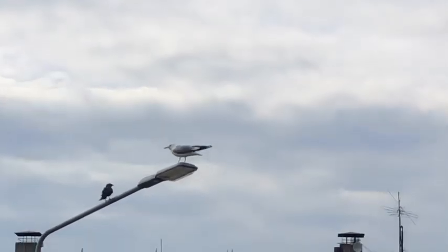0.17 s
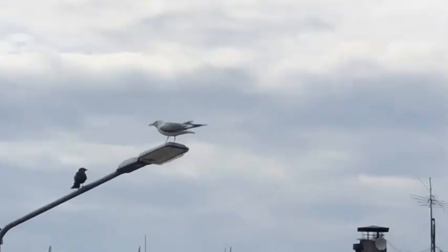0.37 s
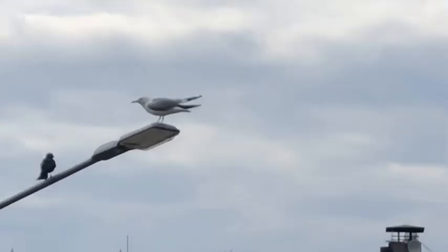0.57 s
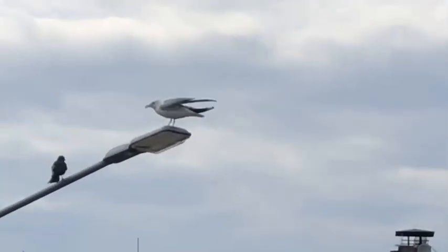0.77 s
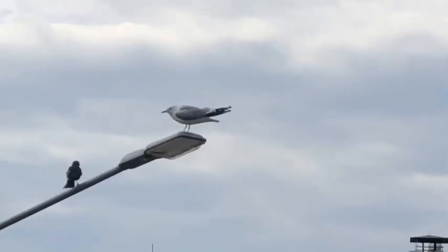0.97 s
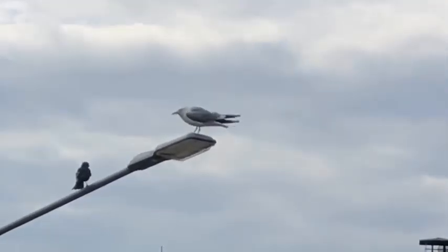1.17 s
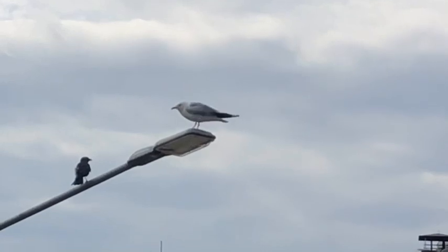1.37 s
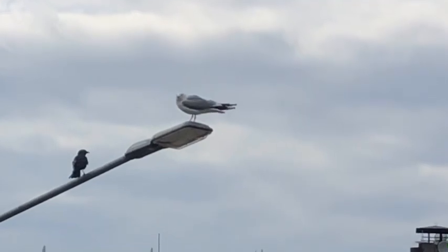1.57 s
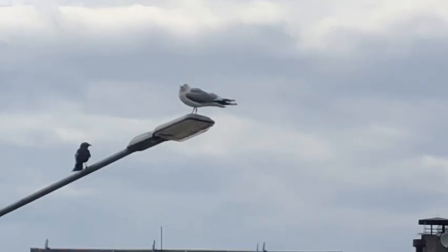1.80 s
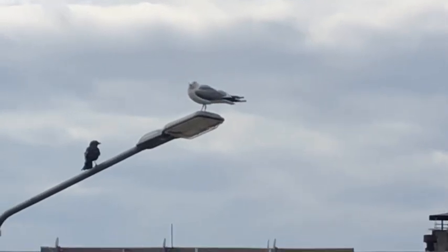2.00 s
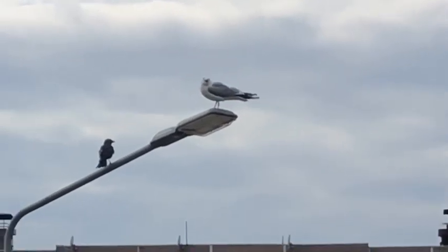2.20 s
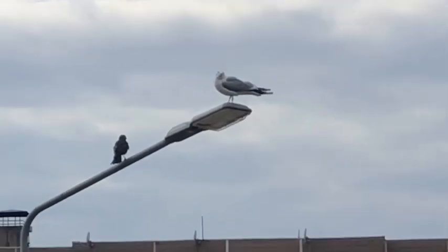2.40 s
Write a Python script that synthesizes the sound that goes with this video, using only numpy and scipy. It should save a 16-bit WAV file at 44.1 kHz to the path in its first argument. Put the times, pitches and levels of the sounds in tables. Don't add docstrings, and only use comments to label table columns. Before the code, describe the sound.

Outdoors in a town, a gull calls harshly at uneven intervals, the last cry brightest after a longer gap. Wind buffets the handheld microphone, fingers thump and tap its case, and a small bird chirps faintly far off.

```python
import sys
import numpy as np
from scipy import signal
from scipy.fft import irfft
from scipy.io import wavfile
from scipy.ndimage import uniform_filter1d

SR = 44100
rng = np.random.default_rng(int(sys.argv[2]) if len(sys.argv) > 2 else 0)


def invert_db(level):
    return 10 ** (np.asarray(level, dtype=float) / 20)


def to_wav(sig):
    pcm = np.clip(np.atleast_2d(sig), -1, 1) * 32767
    pcm = np.round(pcm).astype(np.int16)
    wavfile.write(sys.argv[1], SR, pcm.T)


N = 108045

# t/s, level/dB
GUSTS = [(0, -47), (.39, -42), (.62, -46.5), (.72, -52.5), (.85, -48.5), (1.049, -53), (1.27, -48.5),
         (1.4, -44), (1.65, -45), (1.8, -56), (2.07, -51.5), (2.3, -49.5), (2.4, -48.5), (2.45, -46.5)]
# start/s, length/s, level/dB
BUFFETS = [(.0, 0.024, -37), (.11, 0.065, -39.5), (.3, 0.082, -44), (.46, 0.18, -47.5), (.82, 0.093, -43.5),
           (.91, .13, -55.5), (1.26, 0.011, -35.5), (1.39, 0.028, -37), (1.56, 0.096, -45),
           (1.72, 0.026, -38.5), (2.15, 0.048, -31), (2.28, 0.068, -44.5)]
# f/Hz, density/dB
WIND_SPECTRUM = [(15, -50), (30, -17), (50, -1), (81, 0.5), (186, -8.5), (320, -24), (576, -33),
                 (1540, -96)]
# f/Hz, density/dB
TOWN_SPECTRUM = [(100, -18), (250, -6.5), (900, -12), (1700, -26), (4000, -30.5), (7700, -41), (13500, -41),
                 (15300, -45.5)]
# start/s, length/s, level/dB
RUBS = [
    (.0, 0.147, -60.5),
    (.312, 0.034, -49),
    (.46, 0.124, -49.5),
    (.87, 0.14, -63.5),
    (1.39, .17, -55),
    (1.535, 0.016, -52),
    (1.55, 0.109, -59),
    (1.71, 0.026, -54),
    (2.06, 0.057, -63),
    (2.35, 0.09, -75),
]
# f/Hz, density/dB
RUB_SPECTRUM = [(150, -18.5), (500, -9), (1000, -7), (3400, -19.5), (5500, -45), (9600, -38),
                (13500, -42.5), (15300, -39.5)]
# break/s, crest after break/s, crest f/Hz, level/dB, break length/s
CRIES = [
    (0.018, 0.0031, 1039, -44, 0.0077),
    (.397, 0.0045, 1039, -42.5, 0.0097),
    (0.792, .025, 1063, -43.5, 0.0057),
    (1.306, .04, 1136, -40.5, .017),
    (2.262, 0.026, 1057, -39.5, 0.0085),
]
# climb/s, climb rate/(Hz/s), fall 50 ms from crest/Hz, last f/Hz, brightness/(dB/oct)
DELIVERIES = [
    (.05, 6400, 290, 730, -6.5),
    (0.055, 4900, 180, 470, -4.5),
    (0.052, 5500, 260, 430, -3.5),
    (0.042, 5800, 320, 590, -2),
    (0.043, 6500, 310, 460, -0.5),
]
# dip f/Hz, dip depth/dB, share of the fall used in rising to crest, body/dB
GAPES = [
    (3950, -12, .3, -1),
    (6600, -7.5, 0.22, -0.5),
    (7590, -5, .15, 0.5),
    (8600, -4.5, .65, 0.5),
    (8700, -8.5, 0.37, 0),
]
# f/Hz, gain/dB
THROAT_LOW = [(650, -6), (1050, -3.5), (1500, -2), (2400, -4.5), (4000, -10.5), (6800, -24.5),
              (9500, -19.5), (14000, -33)]
# f/Hz, gain/dB
THROAT_HIGH = [(600, 1.5), (1100, -9), (2100, 0), (3300, 0), (5300, -7.5), (8000, -15), (11000, -18),
               (16000, -29.5)]
# delay/s, level/dB, smear/s
ECHOES = [(.045, -28.5, 0.017), (.07, -30, 0.0075), (0.107, -24, 0.035), (.19, -23.5, 0.058),
          (.325, -27, 0.033), (.485, -25, 0.018), (.575, -24, 0.016)]
# delay/s, level/dB
NEAR_WALLS = [(.0076, -16.5), (.0094, -17), (.0172, -7.5), (0.0214, -13), (0.0232, -11), (0.0275, -17.5)]
# t/s, peak/dB, brightness f/Hz
TAPS = [(.212, -24, 1310), (0.2142, -30, 2500), (.287, -35.5, 815), (0.32, -35.5, 1600), (.316, -42, 2200),
        (.323, -41, 2500), (.327, -32, 1030), (0.329, -53, 707), (.58, -32, 930), (.615, -30.5, 1850),
        (1.095, -46, 865), (1.111, -44.5, 1620), (1.128, -31.5, 1690), (1.258, -33.5, 1030),
        (1.538, -36.5, 1870), (1.547, -52, 890), (1.693, -45.5, 719), (1.744, -27, 1040), (1.845, -50, 915),
        (2.096, -41, 1175), (2.158, -61, 2500), (2.179, -54, 1490)]
# centre t/s, peak/dB, f/Hz, length/s
THUMPS = [
    (.2325, -7.6, 86, .0105),
    (.223, -18, 135, .004),
    (.2158, -22.5, 310, .0018),
    (.1577, -28, 190, .004),
    (.1285, -30, 150, .004),
    (.677, -29, 92, .012),
    (1.152, -31, 64, .016),
    (2.196, -29, 75, .012),
    (.29, -31, 62, .02),
]
# t/s, peak/dB
TICKS = [(0.2095, -54.5), (1.0048, -54), (1.042, -50.5), (1.1224, -55), (1.8048, -51), (1.8437, -64),
         (2.0004, -57.5), (2.104, -56), (2.1497, -53), (2.072, -56.5), (2.178, -57.5), (2.095, -55)]
# t/s, level/dB, f/Hz, length/s
POPS = [
    (1.04, -41, 920, 0.005),
    (1.899, -44, 986, 0.0041),
    (2.072, -45, 800, 0.0076),
    (2.125, -40, 700, 0.005),
    (.695, -48, 860, 0.0044),
]
# t/s, level/dB
CHIRPS = [
    (1.424, -53.5),
    (1.501, -57),
    (1.578, -58),
    (1.663, -56.5),
    (1.74, -57),
    (1.843, -58.5),
    (1.919, -62),
    (2.008, -59.5),
    (.72, -63),
    (2.197, -78),
]

TOWN_DB, TOWN_FOLLOWS_GUST = -56.5, 0.28
RUB_EDGE_S = 0.01
HISS_DB, HISS_LOW_HZ, HISS_RUB_DB = -67.5, 15000, -12

JITTER, SHIMMER_DB, UNEVEN_DB = 0.0045, 2, 1.54
RASP_LOW_DB, RASP_HIGH_DB, RASP_SAG_DB_PER_OCT = -15.5, -19, 14
BREAK_HZ, BREAK_DB, SAG_POWER = 798, -5, 2.3
DIP_OCT, BODY_HZ = 0.1, 2500
DULL_HZ, DULL_DB_PER_OCT = 4450, 24
TAIL_HZ, TAIL_DB_PER_OCT = 1350, -23.5
ATTACK_S, RELEASE_S, LOW_DB, SAG_DB_PER_OCT = 0.026, 0.021, -2.5, 18
CRY_LEAD, CRY_LEN = 3000, 10000

ECHO_LOW_HZ, ECHO_CUT_HZ, NEAR_CUT_HZ = 1710, 4400, 3900
STREET_DB, STREET_T60_S = -22.5, 0.18
TAP_TURNS, TAP_BASS_HZ, TAP_LEN = 1.55, 82, 4096
TICK_HZ, TICK_S = 5540, 0.0015
CHIRP_TOP_HZ, CHIRP_END_HZ, CHIRP_S, CHIRP_ROUGH = 6200, 3800, 0.028, 0.12
CUTOFF_HZ = 15900


def rms_one(x):
    return x / np.sqrt(np.mean(x ** 2) + 1e-20)


def at_hz(points, hz):
    points_hz, points_db = np.transpose(points)
    return np.interp(np.log(hz), np.log(points_hz), points_db, left=-45)


def drift(rate_hz, size=N):
    r = np.exp(-40 * np.pi * rate_hz / SR)
    white = rng.standard_normal(size // 20 + 1002)
    slow = signal.lfilter([1], [1, -2 * r, r * r], white)[1000:]
    return np.interp(np.arange(size) / 20, np.arange(len(slow)), rms_one(slow))


def swell(rows, edge_s):
    t = np.arange(N) / SR
    out = np.zeros(N)
    for start, length, db in rows:
        inside = np.minimum(t - start, start + length - t)
        out += invert_db(db) * np.clip(inside / edge_s + 0.5, 0, 1) ** 2
    return out


def banded_noise(spectrum, patchy_db, rate_hz):
    out = np.zeros(N)
    together = drift(rate_hz)
    edges = 22.2 * 2 ** np.arange(0, 9.6, 0.5)
    white = rng.standard_normal((2, N))
    for k, (low, high) in enumerate(zip(edges, edges[1:])):
        sos = signal.butter(2, [low, high], "band", fs=SR, output="sos")
        band = signal.sosfilt(sos, white[k % 2])
        flicker_db = patchy_db * (1.1 * together + drift(rate_hz))
        out += invert_db(at_hz(spectrum, np.sqrt(low * high)) + flicker_db) * band
    return rms_one(out)


def wind(gust_db):
    air = banded_noise(WIND_SPECTRUM, patchy_db=2.25, rate_hz=10)
    air = rms_one(air / np.sqrt(uniform_filter1d(air ** 2, size=2600) + 0.056))
    return (invert_db(gust_db) + swell(BUFFETS, 0.016)) * air


def town(gust_db):
    level_db = TOWN_DB + TOWN_FOLLOWS_GUST * (gust_db - gust_db.mean())
    return invert_db(level_db) * banded_noise(TOWN_SPECTRUM, patchy_db=1.06, rate_hz=7.5)


def rubs():
    return swell(RUBS, RUB_EDGE_S) * banded_noise(RUB_SPECTRUM, patchy_db=1.1, rate_hz=90)


def hiss():
    band_hz = [HISS_LOW_HZ, HISS_LOW_HZ + 800]
    sos = signal.butter(2, band_hz, "band", fs=SR, output="sos")
    level = invert_db(HISS_DB) + invert_db(HISS_RUB_DB) * swell(RUBS, 0.05)
    return level * signal.sosfilt(sos, rng.standard_normal(N))


def cry(call, delivery, gape):
    break_s, crest_s, crest_hz, db, break_length_s = call
    climb_s, climb_rate, sag_hz, end_hz, bright_db = delivery
    dip_hz, dip_db, rise, body_db = gape
    t = np.arange(-CRY_LEAD, CRY_LEN - CRY_LEAD) / SR
    high = np.clip(t / break_length_s + 0.5, 0, 1)

    fall_hz = np.where(t < crest_s, rise, 1) * sag_hz
    arch = np.maximum(crest_hz - fall_hz * np.abs(20 * (t - crest_s)) ** SAG_POWER, 300)
    sag_oct = np.log2(arch / crest_hz)
    climb = BREAK_HZ + climb_rate * t
    pitch = ((1 - high) * climb + high * arch) * (1 + JITTER * drift(170, CRY_LEN))

    k = np.arange(1, 26)[:, None]
    hz = k * pitch

    def bell(center_hz, width_oct):
        return np.exp(-(np.log2(hz / center_hz) / width_oct) ** 2)

    tilt = bright_db * np.log2(np.maximum(hz / 3500, 1))
    tilt = tilt + high * DULL_DB_PER_OCT * sag_oct * bell(DULL_HZ, 1.07)
    tilt = tilt + dip_db * bell(dip_hz, DIP_OCT)
    tilt = tilt + high * body_db * bell(BODY_HZ, 0.48)
    tilt = tilt + BREAK_DB * 4 * high * (1 - high) * (k > 3)
    tilt = tilt + high * TAIL_DB_PER_OCT * sag_oct * bell(TAIL_HZ, 0.45)
    throat = (1 - high) * at_hz(THROAT_LOW, hz) + high * at_hz(THROAT_HIGH, hz)
    gains = invert_db(throat + tilt) * (hz < 16000)

    flutter_db = [SHIMMER_DB * drift(73, CRY_LEN) + UNEVEN_DB * drift(7.8, CRY_LEN) for _ in k]
    phase = 2 * np.pi * np.cumsum(pitch) / SR
    tone = np.sum(gains * invert_db(flutter_db) * np.cos(k * phase + 0.3 * k ** 2), axis=0)
    rasp_db = RASP_LOW_DB + high * (RASP_HIGH_DB - RASP_LOW_DB - RASP_SAG_DB_PER_OCT * sag_oct)
    tone = tone * (1 + drift(380, CRY_LEN) * invert_db(rasp_db))

    end_s = crest_s + ((crest_hz - end_hz) / sag_hz) ** (1 / SAG_POWER) / 20
    shape = np.clip(np.minimum((t + climb_s) / ATTACK_S, (end_s - t) / RELEASE_S), 0, 1)
    shape = shape * invert_db(db + (1 - high) * LOW_DB + high * SAG_DB_PER_OCT * sag_oct)
    out = np.zeros(N + 13000)
    i = int(break_s * SR)
    out[i:i + CRY_LEN] = tone * shape
    return out[CRY_LEAD:N + CRY_LEAD]


def street(x):
    t = np.arange(SR) / SR
    shape = invert_db(STREET_DB - 60 * t / STREET_T60_S) * np.minimum(t / 0.0036, 1) * 0.021
    for delay, db, smear in ECHOES:
        shape += invert_db(db) * np.exp(-((t - delay) / smear) ** 2) / np.sqrt(smear * SR)
    near = np.zeros(SR)
    for delay, db in NEAR_WALLS:
        near[int(delay * SR)] += invert_db(db)
    far_filter = signal.butter(1, [ECHO_LOW_HZ, ECHO_CUT_HZ], "band", fs=SR)
    reply = signal.lfilter(*far_filter, shape * rng.standard_normal(SR))
    reply = reply + signal.lfilter(*signal.butter(1, NEAR_CUT_HZ, fs=SR), near)
    return signal.fftconvolve(x, reply)[:N]


def thumps():
    t = np.arange(N) / SR
    out = np.zeros(N)
    for s, db, hz, length in THUMPS:
        pulse = np.exp(-((t - s) / length) ** 2)
        out += invert_db(db) * pulse * np.cos(2 * np.pi * hz * (t - s) + 1.3)
    return out


def taps():
    out = np.zeros(N + TAP_LEN)
    hz = np.arange(1, 2050) * SR / TAP_LEN
    late = np.exp(-2j * np.pi * TAP_TURNS * np.log(hz))
    late = late * hz ** 2 / (hz ** 2 + TAP_BASS_HZ ** 2) / np.sqrt(1 + hz / 300)
    for s, db, bright_hz in TAPS:
        tap = irfft(late / (1 + (hz / bright_hz) ** 3.4), TAP_LEN)
        i = int(s * SR)
        out[i:i + TAP_LEN] += invert_db(db) * tap / np.abs(tap).max()
    return out[:N]


def ticks():
    t = np.arange(N) / SR
    burst = sum(invert_db(db - 6) * np.exp(-((t - s - TICK_S) / TICK_S) ** 2) for s, db in TICKS)
    sos = signal.butter(2, TICK_HZ, "high", fs=SR, output="sos")
    return signal.sosfilt(sos, burst * rng.standard_normal(N))


def pops():
    t = np.arange(N) / SR
    out = np.zeros(N)
    for s, db, hz, length in POPS:
        pulse = np.exp(-((t - s - length / 2) / length * 3) ** 2)
        out += invert_db(db) * pulse * np.sin(2 * np.pi * hz * t)
    return out


def chirps():
    t = np.arange(N) / SR
    out = np.zeros(N)
    blur = drift(300)
    for s, db in CHIRPS:
        u = np.clip((t - s) / CHIRP_S, 0, 1)
        hz = CHIRP_TOP_HZ + (CHIRP_END_HZ - CHIRP_TOP_HZ) * u
        hz = hz * (1 + CHIRP_ROUGH * blur)
        out += invert_db(db - 7) * np.sin(np.pi * u) * np.sin(2 * np.pi * np.cumsum(hz) / SR)
    return out


def scene():
    gust_db = np.interp(np.arange(N) / SR, *np.transpose(GUSTS))
    air = wind(gust_db) + town(gust_db)
    gull = sum(cry(*rows) for rows in zip(CRIES, DELIVERIES, GAPES))
    handling = rubs() + hiss() + thumps() + taps() + ticks() + pops()
    return (air + gull + street(gull) + handling + chirps())[None]


def roll_off(x):
    return signal.sosfilt(signal.butter(12, 15890, fs=SR, output="sos"), x)


def record(dry):
    sos = signal.ellip(10, 0.5, 60, CUTOFF_HZ, fs=SR, output="sos")
    cut = signal.sosfilt(sos, dry)
    return roll_off(cut)


dry = scene()
out = record(dry)
to_wav(out)
```